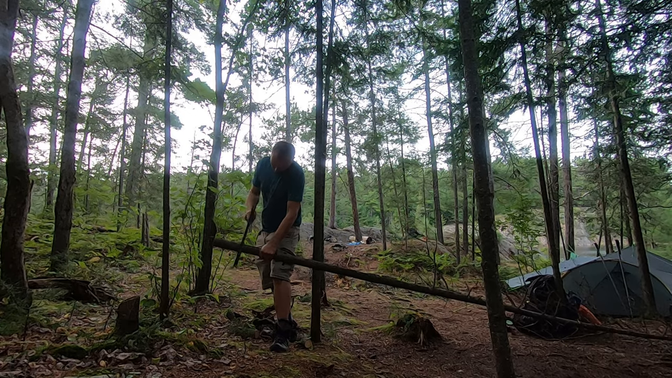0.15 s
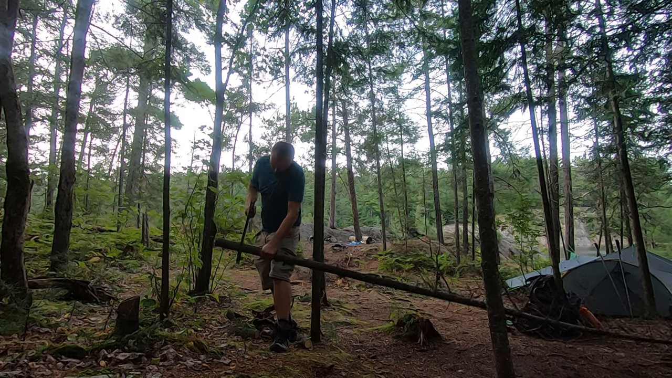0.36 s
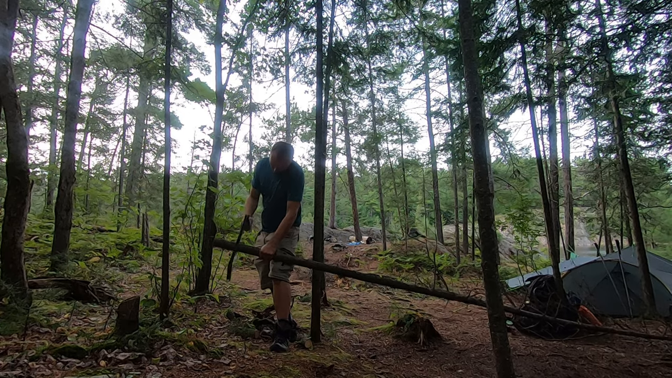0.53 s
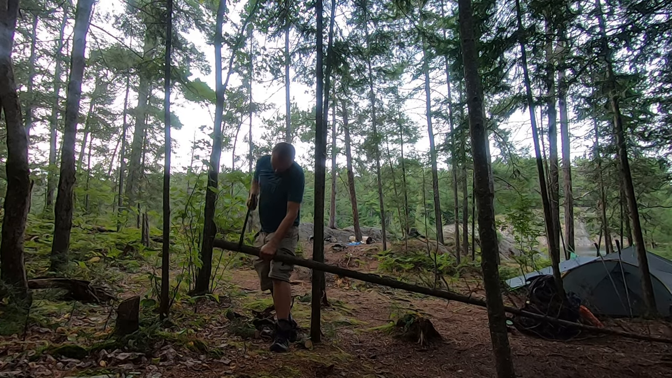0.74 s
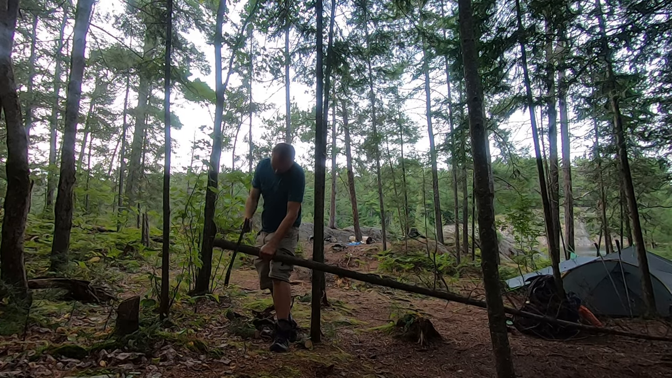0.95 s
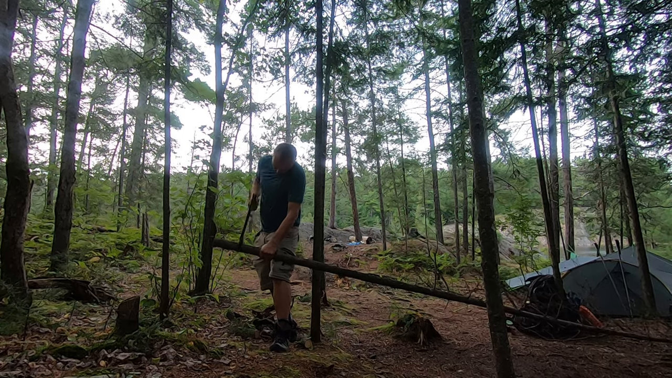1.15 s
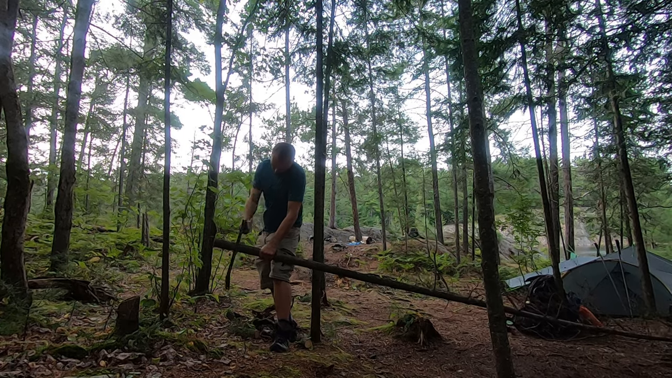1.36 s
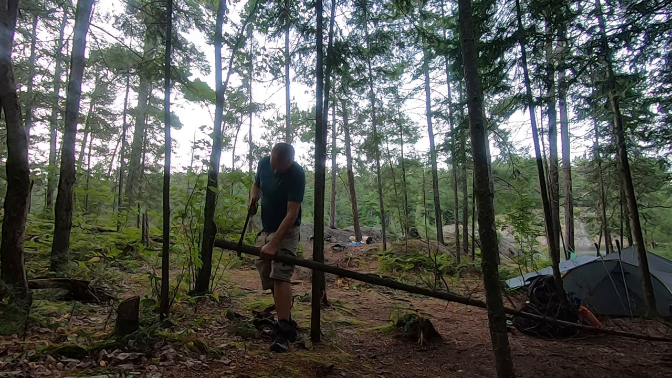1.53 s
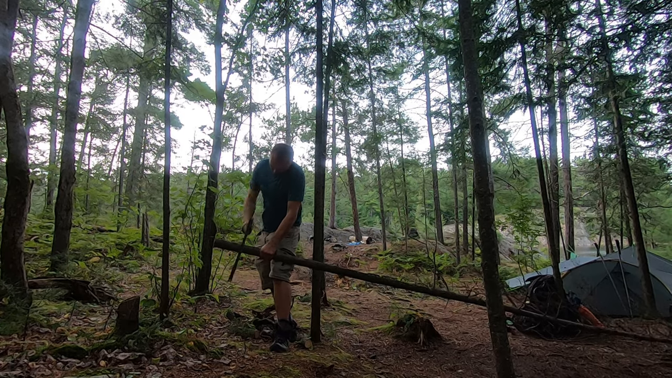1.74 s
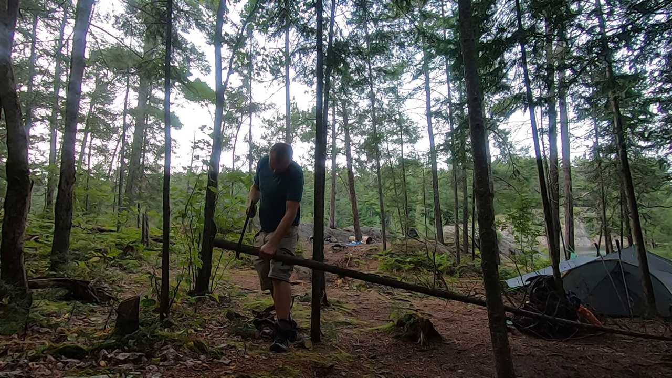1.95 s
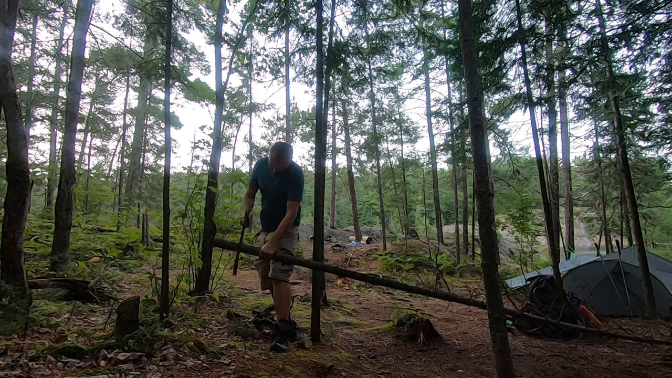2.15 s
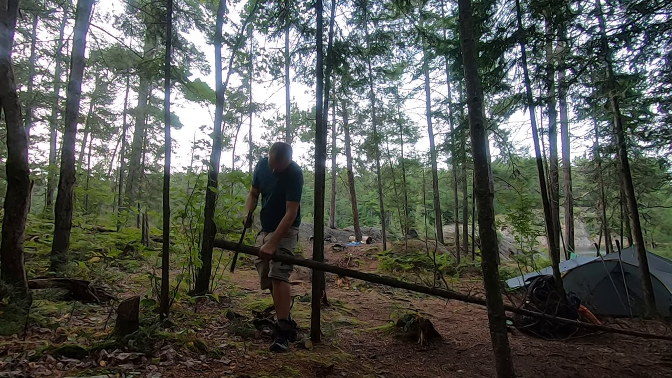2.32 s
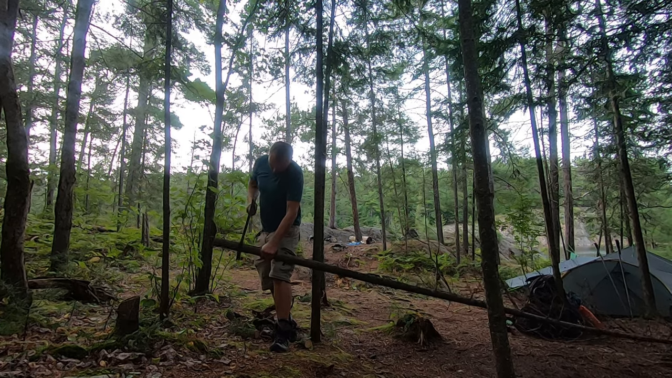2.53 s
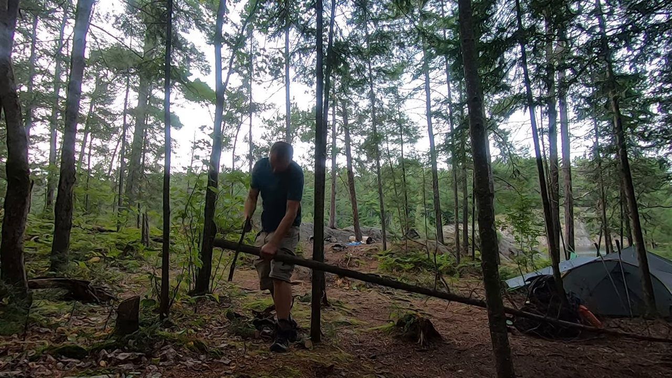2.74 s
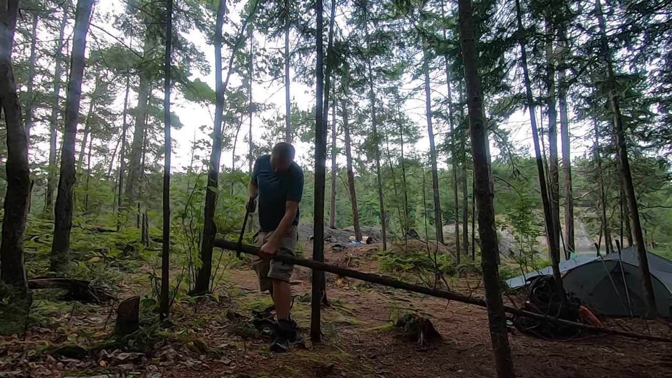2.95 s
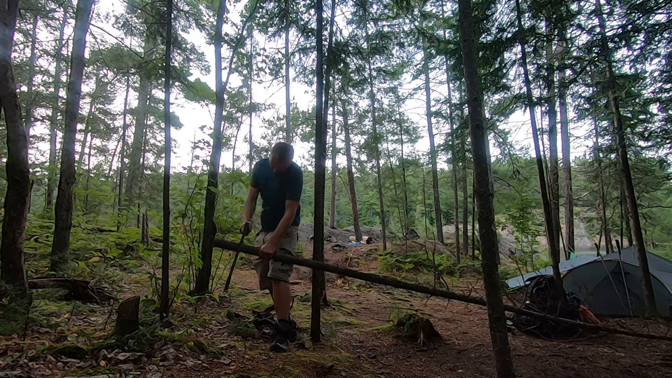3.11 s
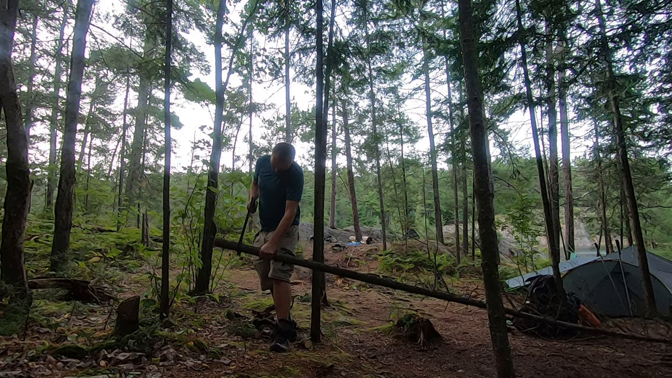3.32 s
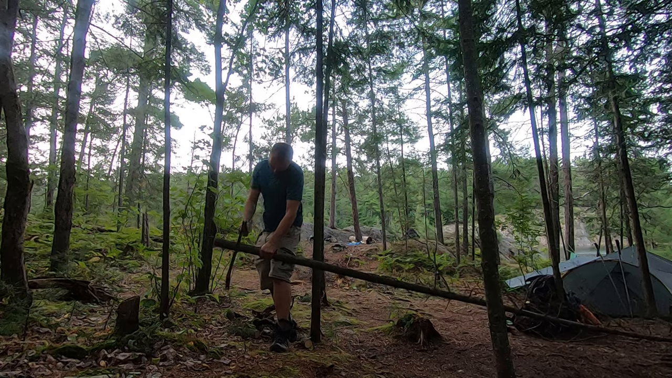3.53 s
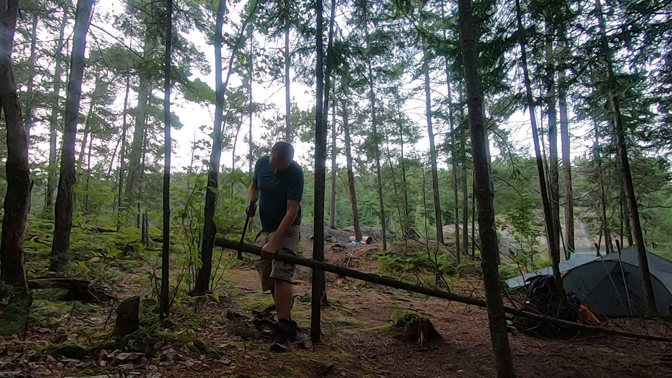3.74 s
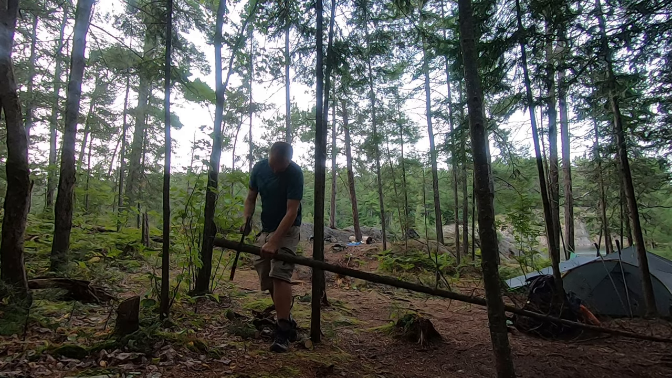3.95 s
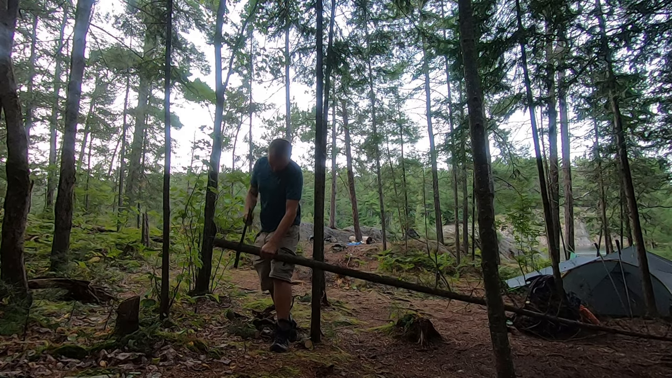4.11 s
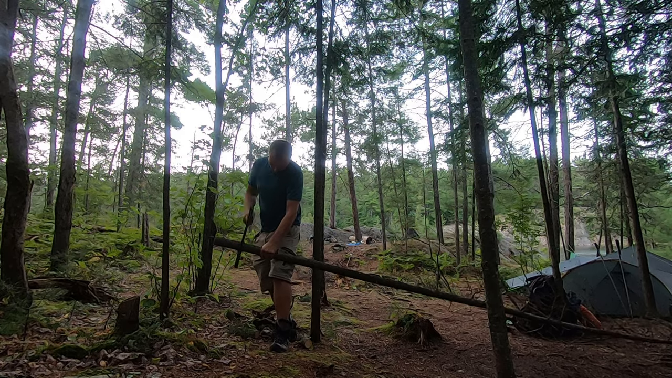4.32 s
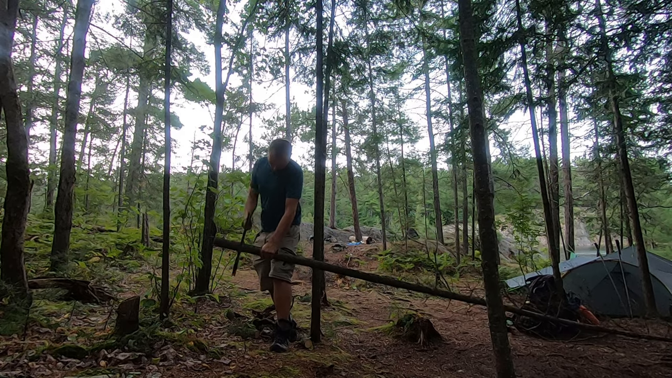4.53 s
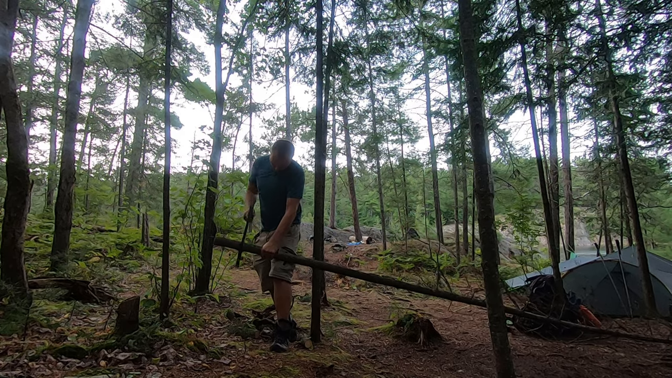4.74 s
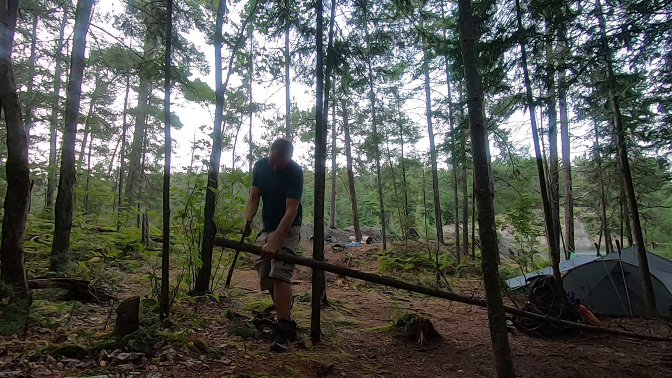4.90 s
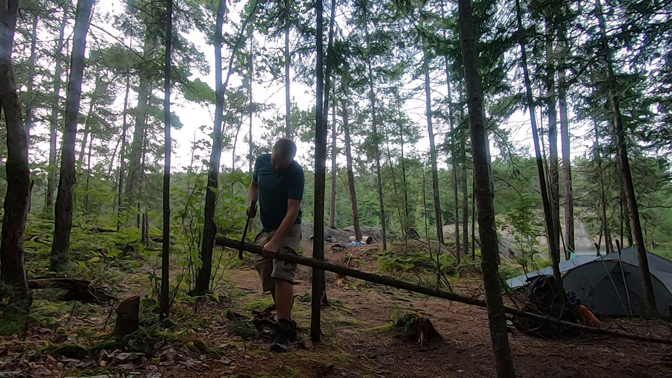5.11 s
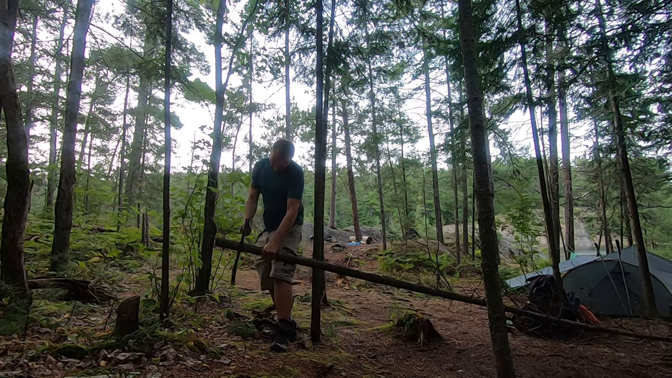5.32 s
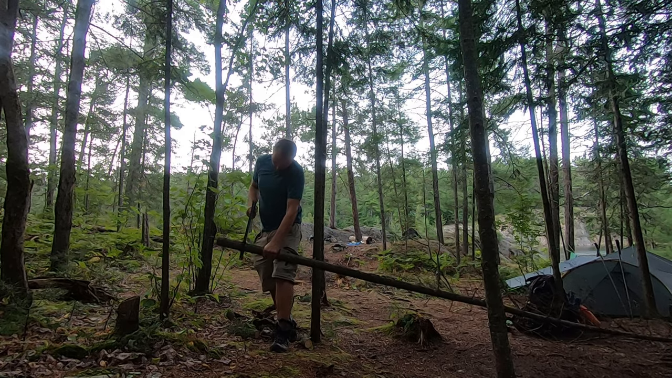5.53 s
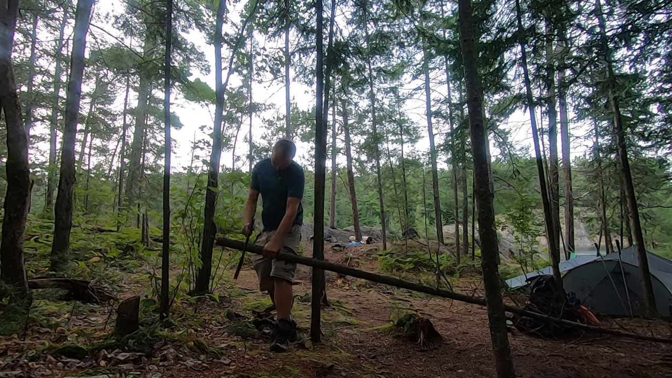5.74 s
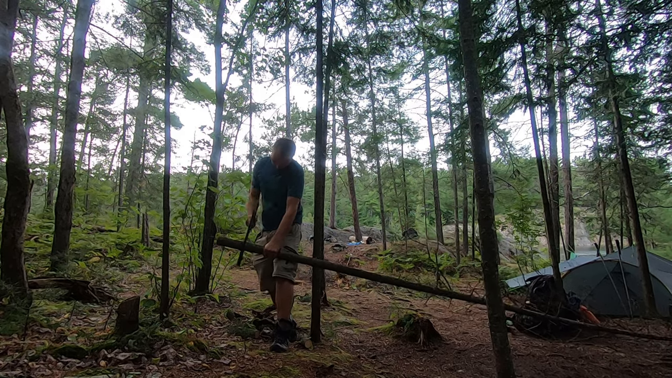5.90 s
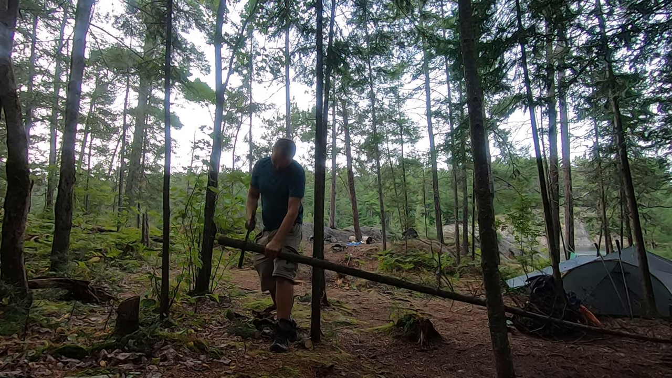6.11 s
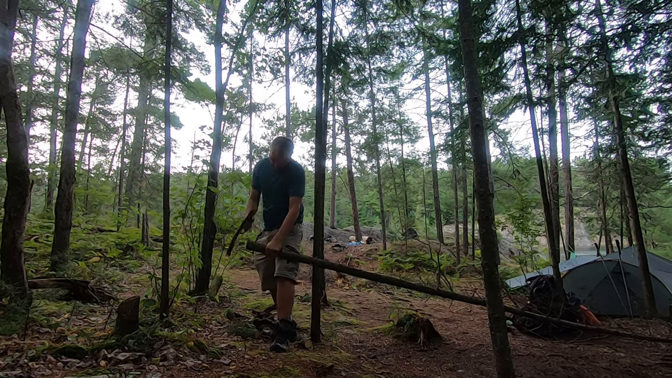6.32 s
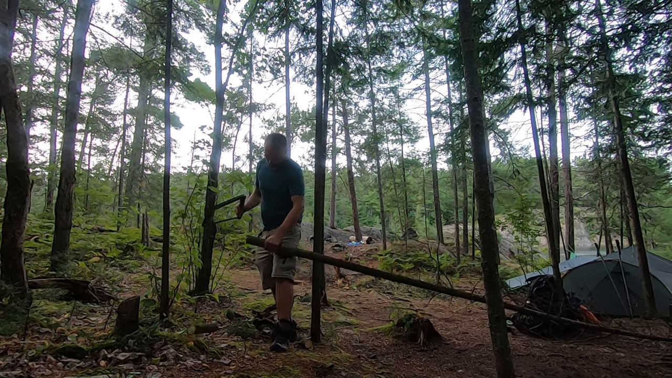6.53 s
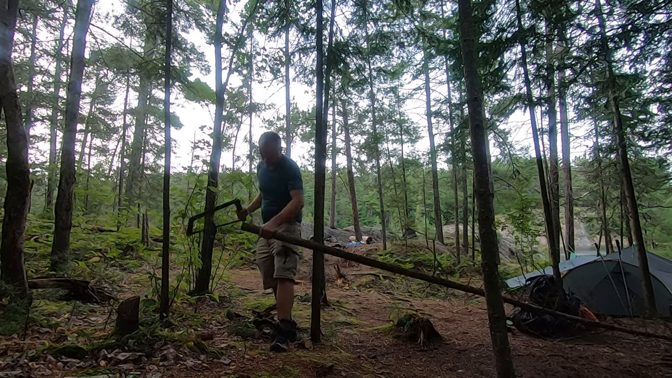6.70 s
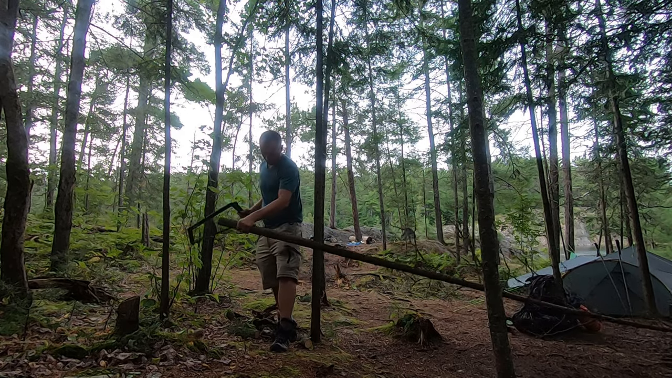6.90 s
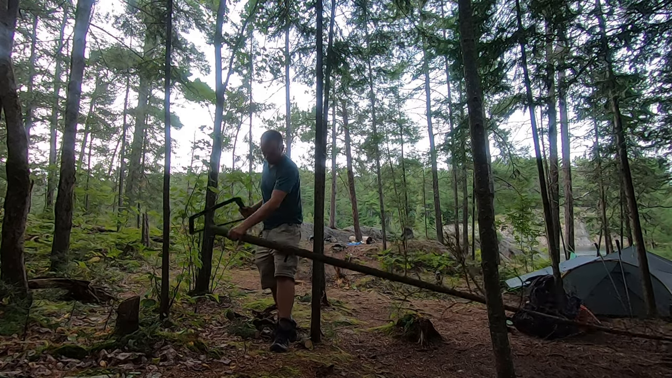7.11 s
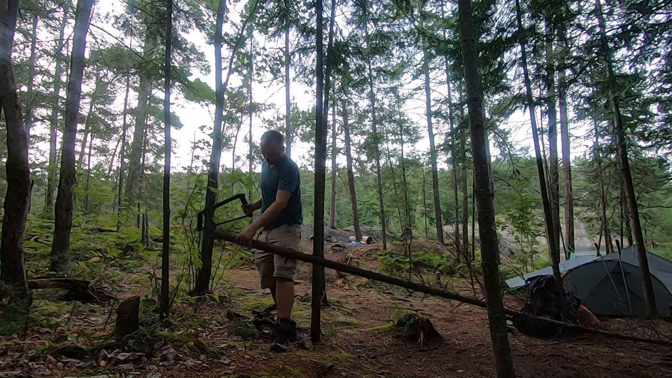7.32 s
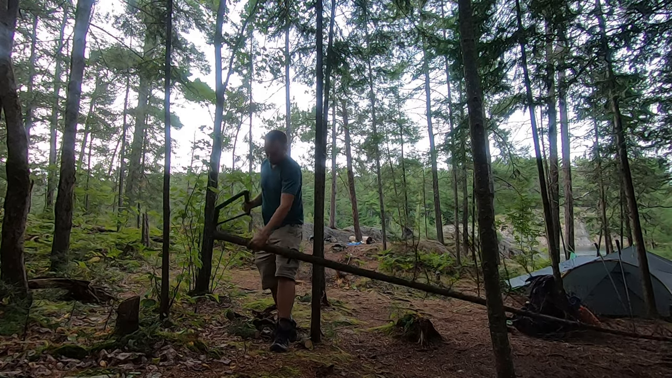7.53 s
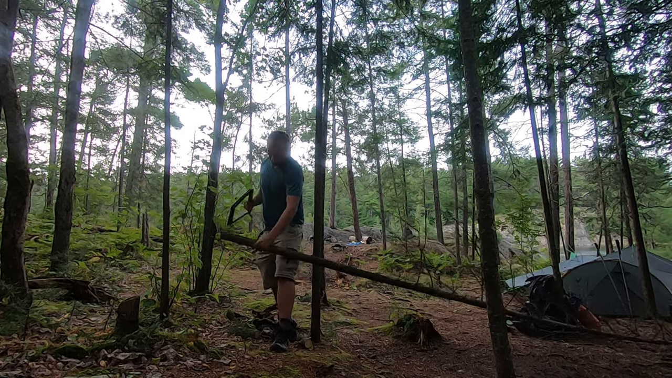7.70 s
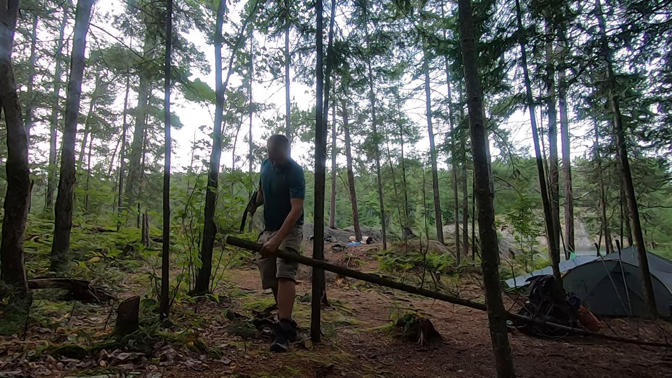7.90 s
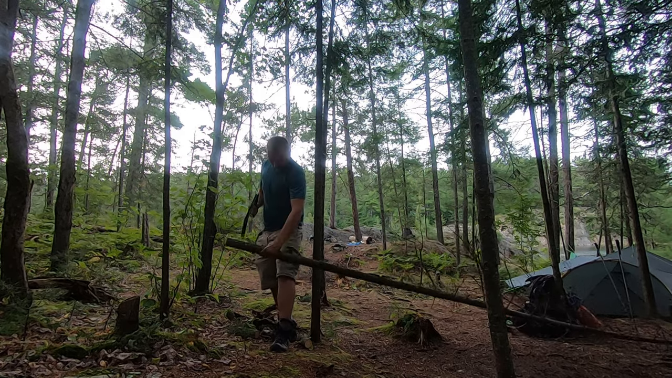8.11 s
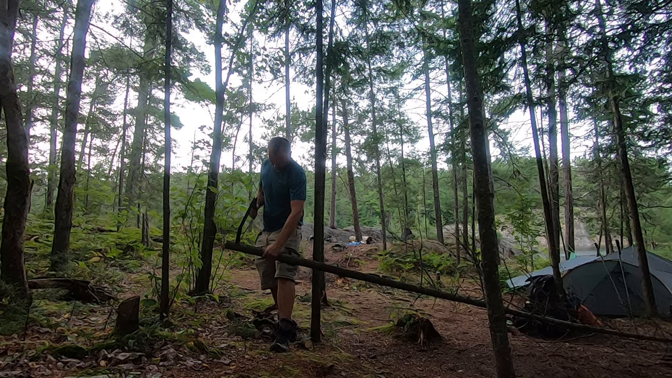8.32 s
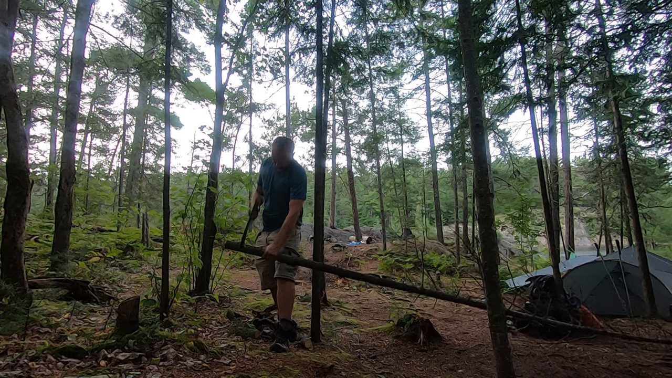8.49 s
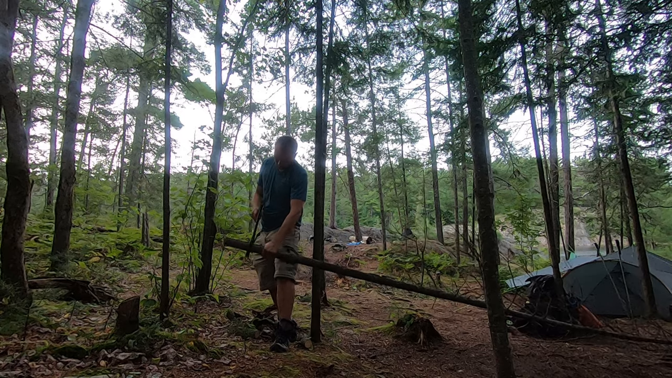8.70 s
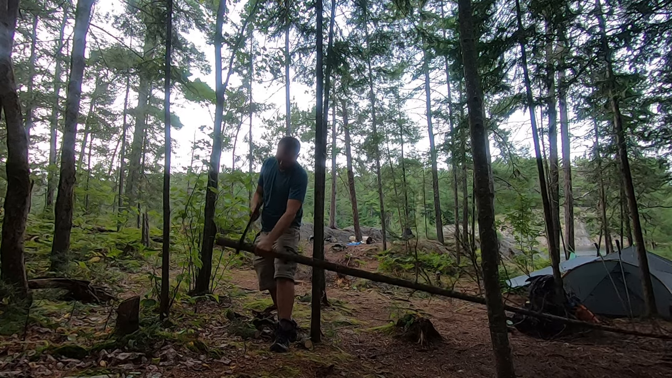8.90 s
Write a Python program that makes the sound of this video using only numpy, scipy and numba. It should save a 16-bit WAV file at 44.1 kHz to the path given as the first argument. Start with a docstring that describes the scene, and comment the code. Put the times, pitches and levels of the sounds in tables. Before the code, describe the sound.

Some metres away in a quiet forest, a bow saw cuts a thin dry log in quick, even strokes, alternately stronger and lighter, raspy with a steely ring. After about six seconds it stops; the cut end drops with a dull thud, then twigs crack, wood knocks and dry litter rustles as the log is shifted. Faint cricket pips and a soft distant hum remain. Small stereo camera microphones.

```python
"""A quiet forest: a bow saw cuts a thin dry log some metres from the stereo microphones of a small camera.
Teeth tear fibres as rough noise that rings the steel frame; the log judders around the tooth rate.
The cut end drops and bounces as low decaying rings, then the log is shifted along: litter rustles as
filtered grains, twigs snap as short rings with broad cracks, a cricket chirps in faint sine pips.
Behind it lie a thin wash from the trunks and a distant hum of shaped noise."""
import sys
import numpy as np
from scipy import signal
from scipy.fft import rfft, irfft, next_fast_len
from scipy.io import wavfile
from scipy.ndimage import uniform_filter1d
from numba import njit

SR = 44100
rng = np.random.default_rng(int(sys.argv[2]) if len(sys.argv) > 2 else 0)


def gain_from_db(level_db):
    """Convert decibel levels to linear amplitude factors (20 dB per decade)."""
    decades = np.asarray(level_db, float) / 20
    return 10 ** decades


def wav_out(sig):
    """Save sig, one row per channel (or a flat mono array), as 16-bit PCM at SR to the path in sys.argv[1]."""
    wavfile.write(sys.argv[1], SR, np.round(np.clip(np.atleast_2d(sig).T, -1, 1) * 32767).astype(np.int16))


N = 394694
T = np.arange(N) / SR  # t/s

# push and pull of the saw in turn: bite t/s, release t/s, relative level/dB
SAW_STROKES = [(-0.045, 0.135, -36.5), (0.214, 0.347, -38.5), (0.432, 0.565, -34), (0.647, 0.788, -38),
               (0.869, 1.016, -34), (1.085, 1.22, -39), (1.302, 1.432, -32.5), (1.515, 1.668, -41.5),
               (1.749, 1.873, -33), (1.949, 2.101, -41.5), (2.173, 2.322, -35), (2.4, 2.537, -41.5),
               (2.626, 2.77, -35.5), (2.839, 2.99, -40.5), (3.064, 3.203, -33.5), (3.276, 3.428, -40),
               (3.497, 3.647, -33.5), (3.724, 3.874, -40.5), (3.943, 4.084, -34), (4.151, 4.298, -44.5),
               (4.385, 4.524, -34.5), (4.586, 4.773, -46.5), (4.814, 4.968, -37), (5.05, 5.185, -42),
               (5.264, 5.424, -37), (5.504, 5.632, -43.5), (5.731, 5.879, -33.5), (5.947, 6.106, -42.5),
               (6.165, 6.253, -38)]
# teeth snag (+) or skip (-) for a moment: t/s, lift/dB
TOOTH_CATCHES = [(0.413, 1), (0.469, 2.5), (.631, -0.5), (0.898, 6.5), (.94, 0), (1.546, 10), (2.654, 1.5),
                 (2.868, 9), (3.776, 9), (4.286, 13.5), (4.445, 4.5), (4.784, 7), (6.13, 10), (6.21, 2.5),
                 (6.227, 8.5)]
# the log shakes with the passing teeth: centre t/s, relative level/dB, f/Hz
LOG_JUDDERS = [(0.07, -63, 380), (0.521, -53.5, 346), (0.702, -54.5, 297), (0.959, -58, 334),
               (1.378, -52, 378), (1.815, -53, 390), (2.699, -43, 325), (3.135, -43.5, 335),
               (3.558, -56.5, 377), (4.014, -54.5, 340), (4.02, -62, 520), (4.485, -55.5, 500),
               (4.488, -54.5, 249.3), (4.892, -60, 290), (5.357, -58.5, 398), (5.803, -56, 307),
               (6.226, -54.5, 343)]
# frame modes left singing; close pairs beat: t/s, level/dB, f/Hz, beats/Hz
FRAME_RINGS = [(.33, -54, 2705, 2), (.98, -47, 2051, 2), (1.85, -46, 2051, 2), (2.069, -51, 2705, 2),
               (6.24, -59, 2153, 13), (6.255, -62, 2955, 14), (6.265, -63, 3425, 15)]
# modes of steel frame and blade: f/Hz, width/Hz, relative level/dB, change on the pull/dB
FRAME_MODES = [(1347, 29, -12.5, -4), (1862, 24, -8.5, 4), (2080, 8, -12, -5), (2145, 30, -5.5, 5),
               (2223, 26, -1.5, 0.5), (2509, 44, 3, 0.5), (2701, 31, 3.5, 0), (2950, 40, 0, -3),
               (3238, 34, 1.5, 0), (3428, 50, -4.5, 4), (3718, 47, -5, 2.5), (4175, 67, -7.5, -3),
               (4800, 110, -12.5, -1), (5790, 96, -15.5, -1)]
# colour of the tearing fibres: f/Hz, gain/dB
TEAR_CURVE = [(1200, -91), (1650, -28), (2000, -8.5), (2630, -3.5), (3300, -4), (4270, -9), (5500, -14),
              (7240, -69)]
# colour of the hiss of the teeth: f/Hz, gain/dB
HISS_CURVE = [(4000, -20), (6000, 7), (8200, -0.5), (8700, 5.5), (10300, 4.5), (11200, -33), (14200, -43),
              (15500, -20)]
# colour of the log's answer: f/Hz, gain/dB
WOOD_CURVE = [(110, -22), (220, 2), (400, 4), (476, -3), (560, -2), (750, 3.5), (936, -0.5), (1340, 9),
              (1700, 1), (2500, -6)]
# dull knocks of wood and ground: t/s, relative level/dB, f/Hz, t60/s
DULL_KNOCKS = [(.797, -51.5, 205, 0.036), (2.873, -46.5, 320, 0.045), (2.911, -47, 258, 0.044),
               (5.584, -56, 260, 0.062), (6.541, -32.5, 127, 0.032), (6.544, -43, 55, 0.1),
               (6.563, -44, 90, 0.044), (6.69, -53.5, 172, 0.069), (6.777, -49, 91, 0.025),
               (7.783, -62, 308, 0.027)]
# twigs and bark: t/s, ring level/dB, ring f/Hz, relative crack level/dB, left minus right/dB
TWIG_SNAPS = [(6.538, -45, 720, -36, -1), (6.602, -54, 2520, -41.5, 1), (7.1935, -42, 3600, -37, -4),
              (7.1935, -42, 1900, -44, 0), (7.206, -37.5, 1510, -30.5, 2), (7.206, -41, 3460, -36, 0),
              (7.244, -51, 1880, -47, -.5), (7.325, -55, 1500, -45, 0), (7.461, -51, 1300, -57, 6),
              (7.683, -52, 3780, -63, -1), (7.712, -45, 3800, -51, -3), (7.714, -52, 1350, -52, -3),
              (7.724, -44.5, 1350, -56, -8), (7.729, -66, 6540, -53, 0), (7.7795, -43, 3670, -45, 1),
              (7.7795, -56, 1310, -37, 1.5), (7.825, -60, 2200, -42, -8), (7.829, -65, 9200, -51, -7),
              (7.957, -38, 1670, -37.5, -8), (7.959, -49, 7000, -56, -9), (7.96, -49.5, 706, -60, -10),
              (8.853, -57, 1580, -49.5, 0)]
# the log knocks on something hollow: columns as in TWIG_SNAPS
HOLLOW_KNOCK, HOLLOW_T60_S = (7.826, -41.5, 794, -41, -11), 0.062
# falling sawdust, then feet and log scuffing litter: loudest t/s, hold/s, level/dB, treble against it/dB
LITTER_SCUFFS = [(6.27, 0.046, -70, -1), (6.552, 0.032, -66.5, -15), (6.892, 0.21, -68.5, -1.5),
                 (7.21, 0.032, -74, 3), (7.3, 0.035, -74, -11), (7.395, 0.088, -71, -7),
                 (7.714, 0.03, -66.5, -10), (7.833, 0.026, -78, 2), (7.968, 0.034, -74, -3),
                 (8.148, 0.22, -77.5, -8), (8.815, 0.073, -73, -10)]
# colour of the body of the rustle: f/Hz, gain/dB
LITTER_CURVE = [(300, -25), (860, 1), (2920, 3), (5500, -9.5), (8000, -61)]
# colour of the crisp top of the rustle: f/Hz, gain/dB
CRISP_CURVE = [(3500, -10), (6000, -3), (10400, -7), (14000, -29), (15500, -35)]
# cricket pips: t/s, level/dB, f/Hz
CRICKET_PIPS = [(8.352, -75, 4950), (8.395, -71, 4950), (8.44, -72, 4950), (8.893, -68, 4250)]
# colour of the distant hum and air: f/Hz, gain/dB
FOREST_CURVE = [(18, -54), (30, -17), (114, -19), (173, -5), (263, -15.5), (467, -20), (727, -13.5),
                (787, -10), (851, -12.5), (1110, -14.5), (4650, -24), (6040, -31.5), (15500, -54)]
# scattered sound, side against mid: f/Hz, gain/dB
SCATTER_CURVE = [(60, -36), (125, -15), (250, -16), (500, -4.5), (1000, -0.5), (2500, -32), (4500, -13.5),
                 (8000, 0.5), (15000, -7.5)]

TEETH_HZ = 390  # mean tooth rate at full speed
FASTEST_SHARE = 0.486  # share of the stroke at which the blade is fastest
# against the cut for a usual stroke, and change per dB of extra force: light strokes still hiss
USUAL_DB = -38.5
HISS_DB, HISS_PER_DB = -17, -0.28
WOOD_DB, WOOD_PER_DB = -19, -0.43
# the blade stands still before each bite: s before it, dip dB, s to die down, s to start again
TURN_S, TURN_DB, TURN_IN_S, TURN_OUT_S = 0.045, -7, 0.02, 0.0097
# blade in the kerf: rings higher at speed
SPAN_HZ, SPAN_RISE_HZ, SPAN_WIDTH_HZ, SPAN_DB = 1900, 867, 238, 3
# a hard judder is short and drags the blade down in pitch; a faint one spreads
JUDDER_S, FAINT_DB, SPREAD_S_PER_DB, DRAG_OCT_S_PER_DB = 0.018, -54, 0.003, 1.25
SNAP_T60_S, SNAP_T60_SLOPE = 0.014, -0.55  # at 1 kHz; higher rings die sooner
SCUFF_RISE_DB_S, SCUFF_FALL_DB_S, TREBLE_FALL_DB_S = 117, 130, 17  # treble falls this much faster
SAW_PAN_DB = 0.87  # left minus right


def shape(x, points):
    """Filter by a (f/Hz, gain/dB) curve, straight over log frequency."""
    hz, db = np.transpose(points)
    size = next_fast_len(N + 4096)
    f = np.arange(size // 2 + 1) * SR / size + 1
    gain = gain_from_db(np.interp(np.log(f), np.log(hz), db))
    return irfft(rfft(x, size) * gain, size)[..., :N]


def unit(x, hz_lo, hz_hi):
    """Scale so that the band has rms 1."""
    sos = signal.butter(4, [hz_lo, hz_hi], "bandpass", fs=SR, output="sos")
    return x / signal.sosfilt(sos, x).std()


def walk(rate):
    """Random levels held 1 / rate s and slewed twice; spread near 1."""
    k = int(SR / rate)
    held = np.repeat(rng.standard_normal(N // k + 1), k)
    return 1.3 * uniform_filter1d(uniform_filter1d(held, k), k)[:N]


def grains(rate, spread_db):
    """Dense tiny breaks, rate per second, of very unequal size."""
    hits = rng.random(N) < rate / SR
    return hits * rng.standard_normal(N) * gain_from_db(spread_db * rng.exponential(size=N))


def ring(x, hz, width):
    """One resonance, gain 1 at its centre."""
    return signal.lfilter(*signal.iirpeak(hz, hz / width, fs=SR), x)


@njit
def glide_ring(x, hz, width):
    """One resonance whose centre moves every sample (state-variable filter)."""
    y, band, low = np.empty(len(x)), 0., 0.
    for i in range(len(x)):
        g, k = np.tan(np.pi * hz[i] / SR), width / hz[i]
        v = (band + g * (x[i] - low)) / (1 + g * (g + k))
        band, low, y[i] = 2 * v - band, low + 2 * g * v, k * v
    return y


def patchy(x, hz_lo, count, depth_db, rate):
    """Half-octave-spaced bands swell and fade on their own."""
    centres = hz_lo * np.sqrt(2) ** np.arange(count)
    return sum(ring(x, hz, 0.61 * hz) * gain_from_db(depth_db * walk(rate)) for hz in centres)


def add(out, s, sound):
    """Mix a sound in at time s."""
    i = int(s * SR)
    out[..., i:i + sound.shape[-1]] += sound[..., :N - i]


def saw():
    """Teeth tear fibres in a dense rasp; frame, blade and log answer."""
    speed, (cut, hiss, wood) = strokes()
    tooth_hz = TEETH_HZ * speed * (1 + 0.0586 * walk(150))
    tooth = 1 + 0.5 * np.cos(2 * np.pi * np.cumsum(tooth_hz) / SR)
    snag = gain_from_db(1.89 * walk(110))
    tear = tooth * snag * (0.63 * grains(5000, 1.3) + 0.55 * rng.standard_normal(N))
    tear = tear / tear.std()
    drive = tear * cut

    # the contact slides along the blade, so every mode is driven unevenly
    pull = np.searchsorted(np.array(SAW_STROKES)[1:, 0] - TURN_S, T) % 2
    frame = np.zeros(N)
    for hz, width, db, pull_db in FRAME_MODES:
        uneven_db = pull_db * pull + 2.1 * walk(9) + 3.26 * walk(45)
        frame += gain_from_db(db) * ring(drive * gain_from_db(uneven_db), hz, width)

    span_hz = (SPAN_HZ + SPAN_RISE_HZ * speed) * (1 + 0.07 * walk(25))
    span = np.zeros(N)
    for ratio, db in [(1, 0), (1.6, -9.5)]:
        uneven = drive * gain_from_db(2.9 * walk(40))
        span += gain_from_db(db) * glide_ring(uneven, ratio * span_hz, float(SPAN_WIDTH_HZ))
    steel = gain_from_db(7) * shape(drive, TEAR_CURVE) + gain_from_db(8.5) * frame + gain_from_db(SPAN_DB) * span

    scrape = patchy(tear + 0.7 * rng.standard_normal(N), 5200, count=4, depth_db=3.2, rate=18)
    scrape = scrape + ring(scrape, 8840, 160) + ring(scrape, 9400, 120)  # high modes of the blade
    rasp = hiss * gain_from_db(2.0 * walk(20)) * unit(shape(scrape, HISS_CURVE), 6400, 12600)

    shaken = patchy(tear + 0.87 * rng.standard_normal(N), 208, count=7, depth_db=2.5, rate=16)
    log = wood * unit(shape(shaken, WOOD_CURVE), 460, 1380)

    # the deepening kerf grips the blade and mutes its lower ring; a slow blade sounds darker
    grip = gain_from_db(3.0 - 6.9 * (T / 5.84) ** 2.17)
    low = shape(steel, [(2650, -2.5), (3100, -21)])
    bright = (steel - low) * gain_from_db(4.8 * (speed - 0.31))
    return bright + (low + log) * grip + rasp


def strokes():
    """Blade speed 0-1 and strength of cut, hiss and wood; force falls off as the blade slows to turn."""
    speed, force = np.zeros(N), np.zeros((3, N))  # force rows: cut, hiss, wood
    for bite, release, db in SAW_STROKES:
        fast = bite + FASTEST_SHARE * (release - bite)
        rise = (fast - T) / max(fast - bite, 0.05)
        fall = (T - fast) / (release - fast)
        u = np.where(T < fast, rise, fall)  # 0 at the fastest, 1 at the release
        speed = np.maximum(speed, np.cos(np.minimum(0.9 * u, np.pi / 2)))
        bend = np.where(T < fast, 1.85, 1.75)  # how round the swell and the fade are
        bends = bend + np.array([[0], [0.3], [0]])
        fall_db = -9 * np.minimum(u, 6) ** bends * np.array([[1.01], [0.88], [0.9]])
        # quieter until the teeth meet the wood again
        fall_db -= 8 * np.clip((bite - TURN_S - T) / TURN_OUT_S, 0, 1)
        hiss_db = HISS_DB + HISS_PER_DB * (db - USUAL_DB)
        wood_db = WOOD_DB + WOOD_PER_DB * (db - USUAL_DB)
        force += gain_from_db(db + np.array([[0], [hiss_db], [wood_db]]) + fall_db)
    for bite, _, _ in SAW_STROKES[1:]:
        gap = T - bite + TURN_S
        dip = np.exp(-0.5 * (gap / np.where(gap < 0, TURN_IN_S, TURN_OUT_S)) ** 2)
        force *= gain_from_db(TURN_DB * dip)
    for s, lift_db in TOOTH_CATCHES:
        onset = np.clip((T - s) / 0.00067, 0, 1)
        force *= gain_from_db(lift_db * np.exp(-np.maximum(T - s, 0) / 0.0089) * onset)
    return speed, force


def frame_rings():
    """A frame mode left singing as the blade lifts off: a beating sine with a slow decay."""
    out, t = np.zeros(N), T[:SR // 3]
    for s, db, hz, beats in FRAME_RINGS:
        level = gain_from_db(db - 60 * t / 0.7) * np.clip(t / 0.012, 0, 1)
        add(out, s, level * np.cos(np.pi * beats * t) * np.sin(2 * np.pi * hz * t))
    return out


def judders():
    """The log groans around the tooth rate; hard judders glide down as they drag the blade."""
    out, t = np.zeros(N), T[:SR // 4] - 1 / 8
    chance = rng.standard_normal((len(LOG_JUDDERS), len(t)))
    for (s, db, hz), noise in zip(LOG_JUDDERS, chance):
        length = JUDDER_S + SPREAD_S_PER_DB * max(FAINT_DB - db, 0)
        glide = -DRAG_OCT_S_PER_DB * max(db - FAINT_DB, 0)  # octaves per s
        wobble = uniform_filter1d(noise, SR // 200) * np.sqrt(SR / 200)
        pitch = hz * 2 ** np.clip(glide * t, -0.9, 0.3) * (1 + 0.065 * wobble)
        turn = 2 * np.pi * np.cumsum(pitch) / SR
        groan = np.sin(turn) + gain_from_db(-9.5) * np.sin(2 * turn + wobble)
        groan += gain_from_db(-8) * ring(noise[::-1], 290, 580)
        level = gain_from_db(db + 3.0 + 2.1 * wobble[::-1]) * np.exp(-0.5 * (t / length) ** 2)
        add(out, s, level * groan)
    centred = np.append(out[SR // 8:], np.zeros(SR // 8))
    return shape(centred, [(90, -5), (180, 1.5)])  # a thin log sends out little bass


def thuds():
    """Soft blows: a low ring that swells over a cycle and sags in pitch."""
    out, t = np.zeros(N), T[:SR // 4]
    for s, db, hz, t60 in DULL_KNOCKS:
        cycles = hz * (t + 0.0023 * (1 - np.exp(-t / 0.00092)))
        level = gain_from_db(db + 10.5 - 60 * t / t60) * (1 - np.exp(-t * hz / 0.51))
        add(out, s, level * np.sin(2 * np.pi * cycles + np.pi))
    return out


def snaps():
    """A short ring, a broad crack and a spill of crumbs from each break."""
    out, t = np.zeros((2, N)), T[:SR // 8]
    breaks = [HOLLOW_KNOCK] + TWIG_SNAPS
    chance = rng.standard_normal((len(breaks), len(t)))
    t60s = [HOLLOW_T60_S] + [SNAP_T60_S * (row[2] / 1000) ** SNAP_T60_SLOPE for row in TWIG_SNAPS]
    for (s, db, hz, crack_db, pan_db), t60, noise in zip(breaks, t60s, chance):
        level = gain_from_db(db - 60 * (t / t60) ** 1.53) * (1 - np.exp(-t * hz / 1.2))
        tone = level * np.sin(2 * np.pi * hz * t)
        broad = ring(ring(noise, hz, 0.96 * hz), hz, 0.96 * hz)
        crack = gain_from_db(crack_db + 9 - 60 * t / 0.011) * broad
        crumbs = gain_from_db(crack_db - 31.5 - 60 * t / 0.18) * ring(noise[::-1], 7000, 8000)
        pan = gain_from_db(np.array([[pan_db], [-pan_db]]) / 2)
        add(out, s, (tone + crack) * pan + crumbs)
    return out


def rustle():
    """Leaves and needles crumble in grains; each scuff swells, holds and fades, treble first."""
    body, top = np.zeros(N), np.zeros(N)
    for s, hold, db, treble_db in LITTER_SCUFFS:
        after = np.maximum(T - s - hold, 0)
        level_db = db - SCUFF_RISE_DB_S * np.maximum(s - T, 0) - SCUFF_FALL_DB_S * after
        body += gain_from_db(level_db)
        top += gain_from_db(level_db + treble_db - TREBLE_FALL_DB_S * after)
    crumbs = (0.8 * grains(2500, 2.4) + 0.7 * rng.standard_normal(N)) * gain_from_db(1.5 * walk(40))
    litter = body * unit(shape(crumbs, LITTER_CURVE), 800, 5700)
    crisp = top * unit(shape(crumbs, CRISP_CURVE), 3500, 13000)
    return (litter + crisp) * (T > SAW_STROKES[-1][1])  # only after the last stroke


def cricket():
    """A few faint pips: sines under a bell-shaped swell."""
    out = np.zeros(N)
    for s, db, hz in CRICKET_PIPS:
        swell = np.exp(-0.5 * ((T - s) / 0.0037) ** 2)
        out += gain_from_db(db) * swell * np.sin(2 * np.pi * hz * T)
    return out


def trunks(x):
    """Trunks send back a thin, fading wash, its own at each microphone."""
    t = T[:SR // 2]
    echo = rng.standard_normal((2, len(t))) * gain_from_db(-60 * t / 0.5) * np.clip(t / 0.0017, 0, 1)
    echo = signal.lfilter([1], [1, -0.15], echo)  # slightly darker
    echo = echo / np.sqrt((echo ** 2).sum(1, keepdims=True))
    return signal.fftconvolve(x[None], echo, axes=1)[:, :N]


def forest():
    """Distant hum and air in the crowns: shaped noise, little alike left and right."""
    mid, side = shape(rng.standard_normal((2, N)) * [[1.1], [0.8]], FOREST_CURVE)
    air = np.array([mid + side, mid - side]) * gain_from_db(0.6 * walk(3))
    return gain_from_db(-68.0) * air / air.std()


def scene():
    """All sources; ground and camera body scatter a share that differs between the microphones."""
    near = saw() + frame_rings() + judders() + thuds() + rustle() + cricket()
    t = T[:SR // 10]
    smear = rng.standard_normal(len(t)) * gain_from_db(-60 * t / 0.092)
    scattered = signal.fftconvolve(near, smear / np.sqrt((smear ** 2).sum()))[:N]
    # the direct sound leans slightly right around 500 Hz-1 kHz and near 8 kHz
    side = shape(scattered - 0.24 * near, SCATTER_CURVE)
    breaks = snaps()
    direct = near * gain_from_db(SAW_PAN_DB * np.array([[0.5], [-0.5]])) + side * [[1], [-1]] + breaks
    return direct + gain_from_db(-19.0) * trunks(near + breaks.mean(0)) + forest()


def band_limit(x):
    """A steep low-pass at the top of the band."""
    return signal.sosfilt(signal.butter(12, 15630, fs=SR, output="sos"), x)


def record(dry):
    """The microphones roll off the very top."""
    mix = shape(dry, [(14000, 0), (15600, -24)])
    return band_limit(mix)


dry = scene()
out = record(dry)
wav_out(out)
```